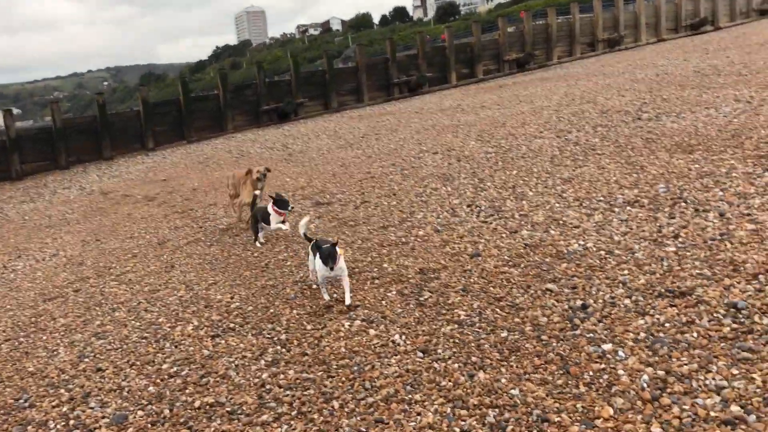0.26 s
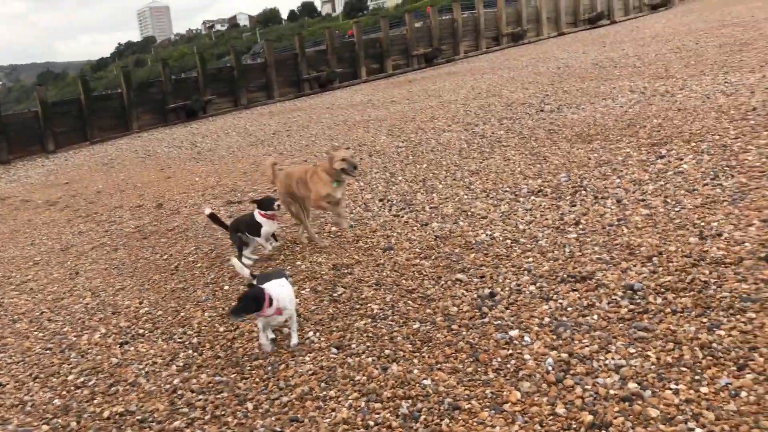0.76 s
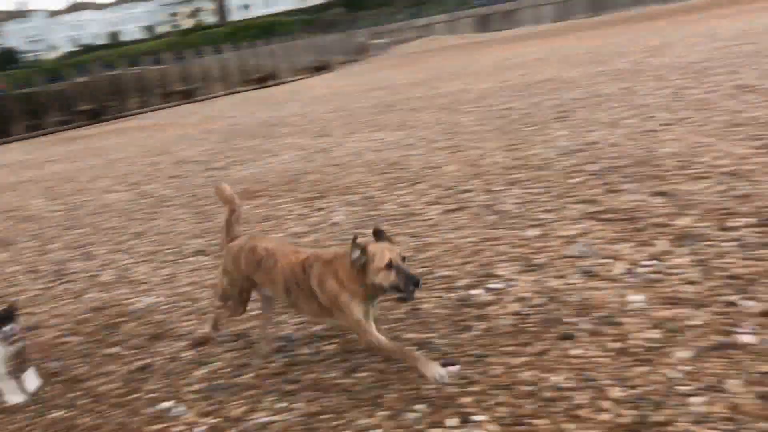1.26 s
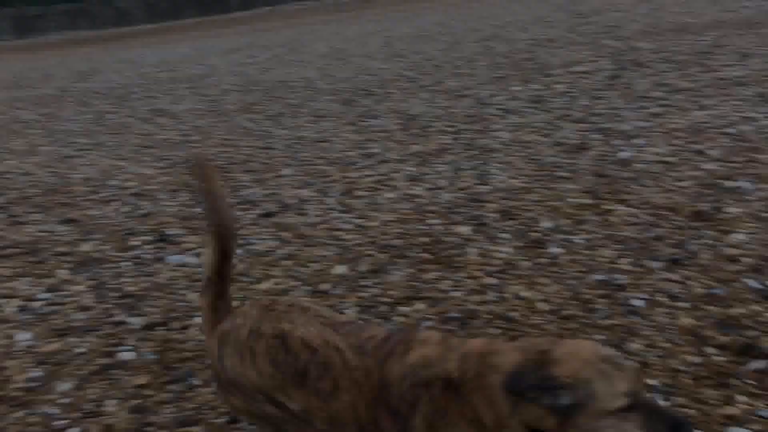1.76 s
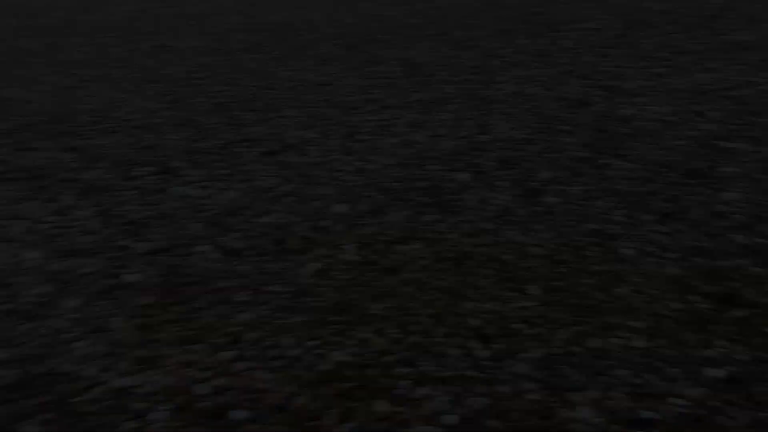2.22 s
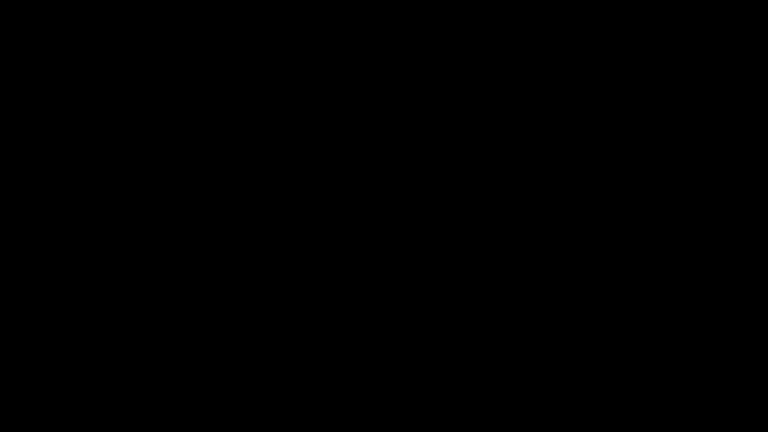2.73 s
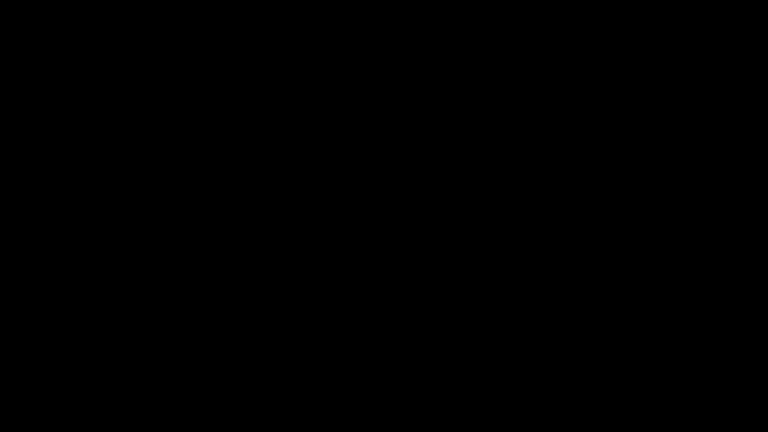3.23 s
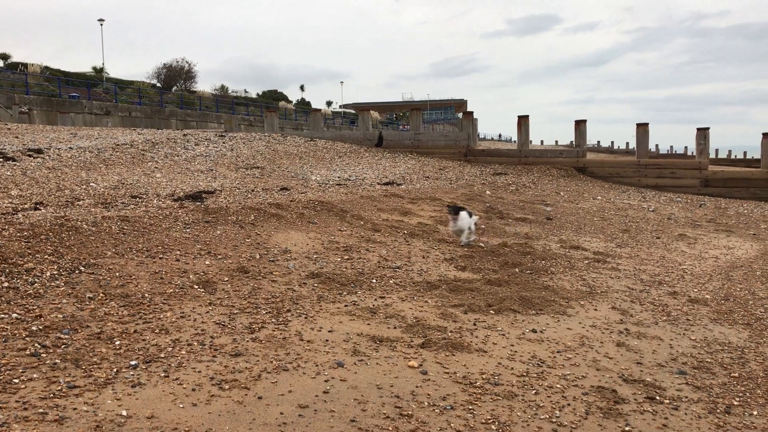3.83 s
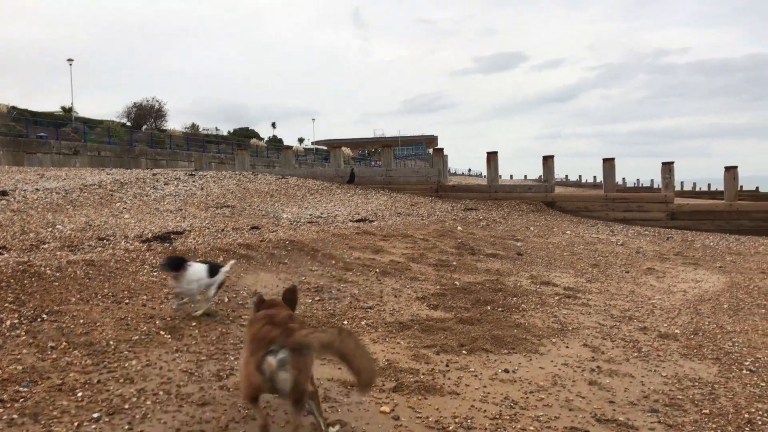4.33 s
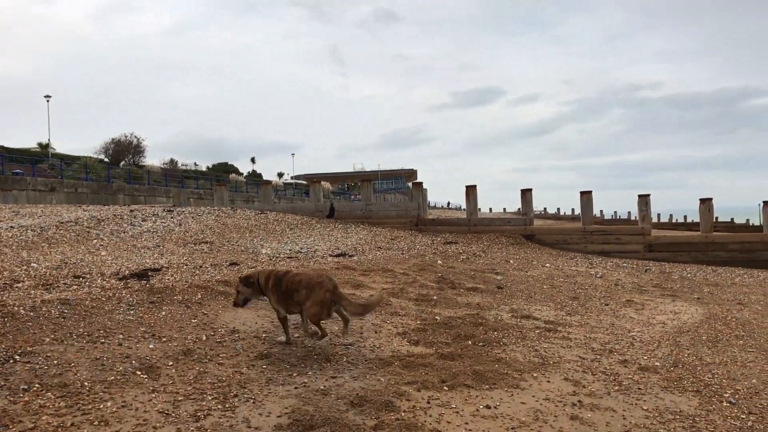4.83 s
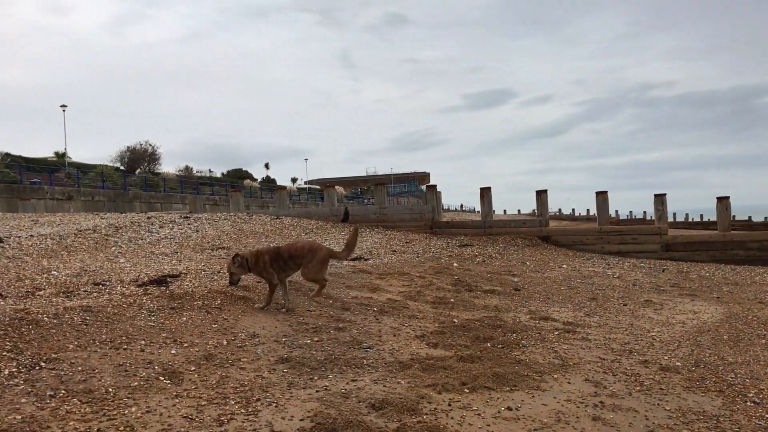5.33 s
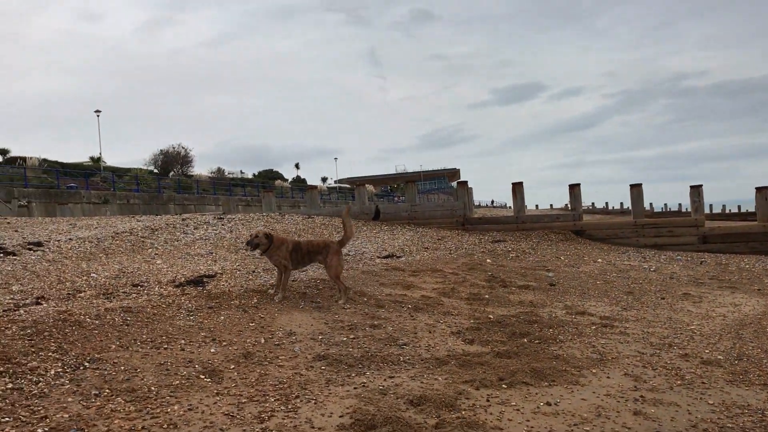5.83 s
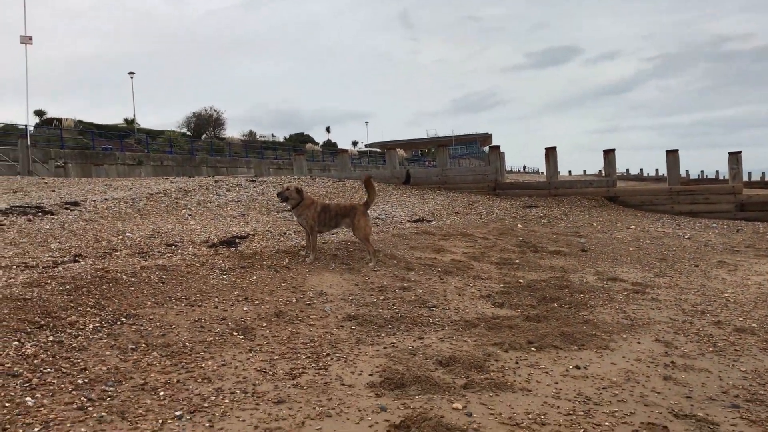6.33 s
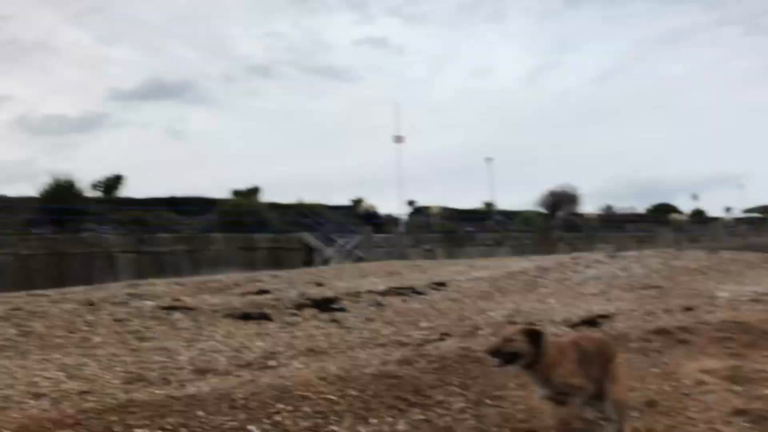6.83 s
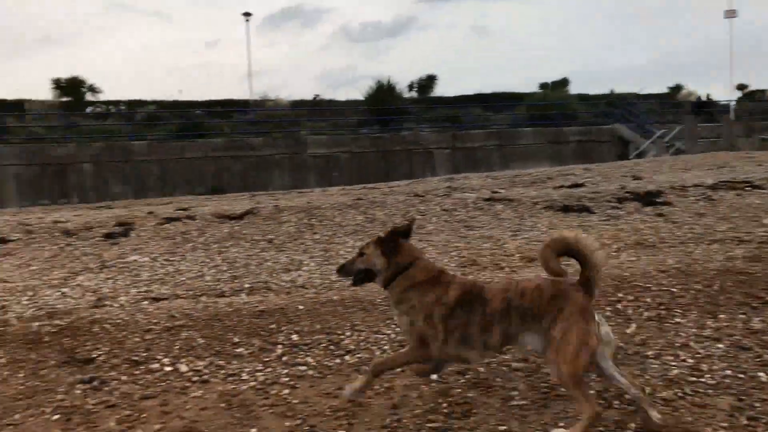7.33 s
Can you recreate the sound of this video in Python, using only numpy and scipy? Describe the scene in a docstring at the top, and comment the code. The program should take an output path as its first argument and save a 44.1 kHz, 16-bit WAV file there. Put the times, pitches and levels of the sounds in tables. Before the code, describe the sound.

Running paws crunch loudly through deep shingle, fade to a brief silence, then lighter pebble steps, stone clacks, tag tinkles and a short dog growl.

```python
"""Shingle crunches under running dogs and a walker: every foot and paw sets off many short pebble knocks.
Single stones clack as sharp ticks with a brief ring; dull low bumps are fading low tones with a soft scuff.
Thin pebbles on damp sand follow the deep shingle, after the sound drops out briefly halfway.
A collar tag tinkles with ringing metal tones; one dog growls in pulses and puffs shaped by its throat.
Filtered noise makes a thin rising scrape, the sand's patter, wind buffeting the one microphone and far-off sea."""
import sys
import numpy as np
from scipy import signal
from scipy.io import wavfile
from scipy.ndimage import map_coordinates

SR = 44100
rng = np.random.default_rng(int(sys.argv[2]) if len(sys.argv) > 2 else 0)


def materialize(psi):
    """Save the field psi as 16-bit PCM at rate SR to the path in sys.argv[1].

    A 1-D psi becomes a single channel; in a 2-D psi each row is a channel.
    """
    bounded = np.clip(np.atleast_2d(psi).T, -1, 1)
    quanta = np.round(bounded * 32767).astype(np.int16)
    wavfile.write(sys.argv[1], SR, quanta)


N = 333560
TIME = np.arange(N) / SR

# Levels in the tables set the balance within a layer; each layer may add its own gain.
# Feet and paws sinking into shingle: peak_s, level_db, fall_s, large_against_small_stones_db
STEPS = [(0.391, -35.5, 0.11, -18), (0.558, -34.0, 0.11, -23), (0.774, -33.0, 0.044, -10),
         (0.882, -31.0, 0.014, -27), (0.943, -31.5, 0.019, -26), (1.006, -29.0, 0.079, -20),
         (1.107, -24.5, 0.034, -17), (1.189, -25.5, 0.071, -11.5), (1.339, -28.5, 0.048, -28),
         (1.444, -16.5, 0.023, -17.5), (1.526, -18.5, 0.024, -11), (1.655, -18.5, 0.036, -22),
         (1.739, -24.0, 0.049, -14), (1.808, -16.5, 0.034, -12.5), (1.882, -14.5, 0.035, -13.5),
         (1.949, -27.5, 0.094, -3.5), (2.021, -22.5, 0.047, -20), (2.128, -20.5, 0.085, -13),
         (2.19, -16.5, 0.04, -12), (2.262, -14.0, 0.066, -17.5), (2.437, -17.5, 0.077, -27),
         (2.62, -29.0, 0.08, -13), (2.795, -26.0, 0.047, -14), (2.826, -26.0, 0.022, -17),
         (3.028, -23.5, 0.041, -14), (3.102, -30.5, 0.015, -12), (3.231, -33.0, 0.052, -16.5),
         (3.769, -43.0, 0.049, -6.5), (3.992, -41.0, 0.088, -5), (4.134, -25.0, 0.012, -6.5),
         (4.18, -32.5, 0.06, -3), (4.313, -30.0, 0.014, -2), (4.357, -34.0, 0.044, -2),
         (4.523, -38.0, 0.054, -0.5), (4.597, -40.5, 0.091, -2), (4.785, -43.0, 0.053, 0.5),
         (4.893, -42.0, 0.13, 0), (4.988, -36.0, 0.052, -2), (5.096, -33.5, 0.021, -10.5),
         (5.153, -41.0, 0.032, -0.5), (5.244, -40.5, 0.083, -3), (5.403, -40.0, 0.064, -1.5),
         (5.508, -43.0, 0.025, -2), (6.976, -44.5, 0.068, -0.5), (7.036, -43.5, 0.05, 3.5),
         (7.145, -43.0, 0.032, -1), (7.244, -37, 0.022, -6.5), (7.335, -30.5, 0.048, -6),
         (7.508, -34, 0.052, -3)]
# Stones shifting under all the other paws as the dogs come near, leave, stand and run again: time_s, level_db
TRAMPLING = [(0, -40), (0.93, -38), (1.53, -26), (1.62, -31.5), (2.05, -26), (2.66, -28.5), (2.78, -40),
             (3.39, -40.5), (3.55, -53.5), (4.1, -51), (4.7, -45), (5.34, -56.5), (5.79, -45), (5.97, -56),
             (6.35, -63), (7.235, -61), (7.255, -39), (7.56, -41)]
# Tone colour of small stones, large stones and stones kicked clear: frequency_hz, relative_level_db (per Hz)
SMALL_STONES = [(150, -43), (700, -31), (2000, -15), (3200, -9.5), (4400, -3.5), (6300, -1.5), (9000, 0.5),
                (12500, 1), (16000, -0.5)]
LARGE_STONES = [(100, -9.5), (300, -4), (520, -2.5), (760, -3), (1050, 1), (2000, -0.5), (3300, 2),
                (4500, 1), (7000, -2), (16000, -45)]
FLUNG_STONES = [(400, -17.5), (1800, -7), (4000, -1), (7000, -0.5), (16000, -12)]
# Tone colour of damp sand under a step: frequency_hz, relative_level_db (per Hz)
SAND = [(70, -34), (150, 4.5), (300, 3), (900, -35.5)]
# Single pebbles struck hard: start_s, level_db, pitch_hz
STONE_CLACKS = [(0.9378, -18, 12800), (1.667, -4.5, 12760), (3.0295, -2, 9700), (3.034, -7, 8300),
                (3.099, -19, 5780), (3.216, -13, 8600), (3.7545, -25.5, 5640), (3.9465, -23.5, 11740),
                (4.131, -11, 12330), (4.2569, -17, 3760), (4.292, -8.5, 2648), (4.313, -7.5, 5920),
                (4.414, -18, 6760), (4.4893, -17.5, 8203), (4.6765, -8, 3520), (5.030, -12, 4335),
                (5.1279, -11, 7133), (5.382, -16, 7150), (6.732, -26.5, 3486), (7.238, -21, 7970),
                (7.333, -15, 6834), (7.419, -15, 4990), (7.498, -17, 3970)]
# Dull low bumps, from paws, jolts of the microphone or wind pops: start_s, level_db, pitch_hz
BUMPS = [(0.403, -19.5, 152.4), (0.428, -21.5, 290), (0.465, -29, 400), (0.78, -29, 285),
         (1.801, -16.5, 279.8), (1.874, -18, 228), (1.890, -17.5, 160), (3.947, -24, 170.4),
         (3.992, -28.5, 216.3), (4.189, -27, 219), (4.311, -19.5, 236), (4.329, -21, 682),
         (4.348, -25, 1091), (4.354, -16.5, 690), (4.357, -19.5, 202), (4.397, -27, 209.4),
         (4.490, -30, 228), (7.042, -26, 109.6), (7.091, -23, 110), (7.100, -25.5, 208)]
# Blows on the collar tag: start_s, level_db, upper_tones_db
TAG_BLOWS = [(2.8804, -24, -11), (3.895, -29.5, 2.5), (4.1057, -36.5, 4.5), (4.4574, -35, 0),
             (5.9366, -41.5, 2.5), (6.066, -40.5, 3), (6.1417, -46, 6), (6.6837, -48, -13),
             (7.2877, -31, 6), (7.4279, -33, 5)]
# Ringing tones of the collar tag: pitch_hz, level_db, time_to_fall_60_db_s
TAG_TONES = [(5723, -12, 0.03), (7221, -3, 0.056), (9670, -6.5, 0.036), (13707, -5, .035)]
# Resonances of the growling dog's throat: pitch_hz, half_width_hz, level_db
THROAT = [(196.6, 54, 5.5), (391.6, 100, -7.5), (1262, 120, -5.5), (2060, 104, -6), (3000, 450, -14)]
# Gusts on the microphone: peak_s, level_db, fall_s
GUSTS = [(0.4, -29, 0.033), (0.44, -31, 0.044), (0.505, -33, 0.018), (0.605, -37, 0.022),
         (0.813, -32.5, 0.021), (0.986, -36.5, 0.031), (1.29, -34, 0.029), (1.525, -41, .022),
         (1.705, -31, 0.027), (1.819, -32, 0.059), (1.891, -32.5, 0.068), (1.987, -30, 0.014),
         (2.216, -46, 0.036), (7.051, -32, 0.019), (7.097, -31.5, 0.029), (7.319, -34.5, 0.027)]
# Strength of the steady breeze: time_s, level_db
BREEZE = [(0.0, -41), (1.1, -42.5), (1.6, -48), (2.2, -46), (3.35, -51.5), (3.8, -44.5), (4.8, -46),
          (6.3, -48.5), (6.9, -44), (7.56, -44.5)]
# Tone colour of breeze, gusts and sea: frequency_hz, relative_level_db (per Hz)
BREEZE_COLOUR = [(20, -20), (35, -9), (52, 12.5), (80, 4.5), (170, 0.5), (300, -15.5), (600, -14),
                 (2000, -42)]
GUST_COLOUR = [(20, -52.5), (40, 10), (60, 6.5), (110, 7.5), (200, -0.5), (320, -16.5), (700, -24.5),
               (2500, -38.5)]
SEA_COLOUR = [(60, -24), (250, 4.5), (440, -3), (700, 3), (1100, 2.5), (1600, 0.5), (2500, -7), (4000, -14),
              (7000, -24), (16000, -19)]
# Dips in treble from the microphone port: centre_hz, width_hz, level_db
PORT_DIPS = [(4900, 110, -4.5), (7640, 340, -2.5), (10480, 490, -4.5)]

GROUND_CHANGE_S = 3.542  # deep shingle gives way to a thin layer of pebbles on damp sand
PRESS_SHARE = 0.44  # a step's build-up time as a share of its fall time
DEEP_COARSE_DB, THIN_COARSE_DB = -10.5, -4.5  # large against small stones in the trampling, on each ground
FLUNG_SHARE, FLUNG_DB = 0.025, -10.5  # a few stones are kicked clear and land with a dry tick
PAD_DB, PAD_FALL_S, PAD_RISE_S = -13, 0.097, 0.033  # the sand's answer, against a step's large stones
SCRAPE_S, SCRAPE_RISE_S, SCRAPE_FALL_S, SCRAPE_DB = 5.39, 0.013, 0.1, -45
SCRAPE_HZ, SCRAPE_HZ_PER_S, SCRAPE_WIDTH_HZ = 2250, 6500, 450
GROWL_S, GROWL_LENGTH_S, GROWL_DB = 4.575, 0.159, -34  # one short growl in the leap
GROWL_ATTACK_S, GROWL_RELEASE_S = 0.017, 0.025
GROWL_HZ, GROWL_SAG_HZ_PER_S = 205.6, 150
GUST_RISE_SHARE = 0.51  # a gust's build-up time as a share of its fall time
SEA_DB = -48.5
FADE_S, QUIET_S = 0.11, 3.5  # a fade ends near this time; almost silent until the ground changes
BLINK_S, BLINK_WIDTH_S, BLINK_DB = 6.941, 0.004, -20  # the level dips briefly
TREBLE_EDGE_HZ = 15850  # the treble is cut around here


def amp(db):
    """Turns decibels into gain."""
    return 10 ** (np.asarray(db) / 20)


def evened(x):
    """Scales a signal to an rms (average strength) of 1."""
    return x / np.sqrt(np.mean(x ** 2) + 1e-20)


def curves(rows, t=TIME):
    """Joins each column of a table by straight lines in time."""
    s, *columns = np.transpose(rows)
    return [np.interp(t, s, c) for c in columns]


def add(mix, s, sound):
    """Mixes a sound in at time s."""
    part = mix[max(round(s * SR), 0):][:len(sound)]
    part += sound[:len(part)]


def filtered(x, db_at, size=8192):
    """Filters with the gain db_at(Hz), never ahead of the sound, so clicks keep their sharp fronts."""
    hz = abs(np.fft.fftfreq(size, 1 / SR))
    log_gain = np.log(amp(np.maximum(db_at(hz), -100)))
    taps = np.fft.ifft(np.exp(np.conj(signal.hilbert(log_gain)))).real
    return signal.oaconvolve(x, taps[:size // 2])[:N]


def coloured(x, spectrum):
    """Gives a white sound a tone colour and keeps its power."""
    f, db = np.transpose(spectrum)

    def colour_db(hz):
        gain = amp(np.interp(np.log(hz + 1), np.log(f), db))
        return 20 * np.log10(evened(gain))

    return filtered(x, colour_db)


def swell(s, rise, fall):
    """Power of one push: it builds up to time s, then dies away."""
    d = TIME - s
    decay = np.where(d < 0, (d / rise) ** 2, d / max(fall, 1e-3))
    return np.exp(-2 * np.minimum(decay, 20))


def flutter(per_s):
    """A random wandering line of rms 1, with per_s corner points a second."""
    knots = rng.standard_normal(4096)
    return evened(np.interp(TIME * per_s, np.arange(len(knots)), knots))


def knocks(per_s, spread_db, ring_s, tick, count=60000, size=128):
    """Pebble contacts of mean power 1: each a tick and a very short ring at the stone's own pitch."""
    gap, pitch, weight, damping, side = rng.random((count, 5)).T
    # random waits between contacts, shorter where per_s is higher
    at = np.searchsorted(np.cumsum(per_s) / SR, np.cumsum(-np.log(1 - gap)))
    at = at[at < N]
    pitch, weight, damping, side = (v[:len(at), None] for v in (pitch, weight, damping, side))
    t = np.arange(size) / SR
    rings = np.sin(np.pi * SR * pitch * t) * np.exp(-t / (ring_s * (0.5 + damping)))
    rings /= np.linalg.norm(rings, axis=1, keepdims=True) + 1e-9
    rings[:, 0] += tick
    # many light knocks and a few heavy ones, pushing either way
    force = evened(amp(spread_db * np.minimum(-np.log(1 - weight), 4.6))) * np.sign(side - 0.5)
    rings *= force * np.sqrt(SR / per_s[at, None] / (1 + tick ** 2))
    places = at[:, None] + np.arange(size)
    return np.bincount(places.ravel(), rings.ravel(), N + size)[:N]


def scatter(x, wet_db, t60):
    """The stony ground gives every contact its own short diffuse tail of noise."""
    keep = np.exp(-2 * np.log(1000) / (t60 * SR))
    tail_level = np.sqrt(signal.lfilter([1 - keep], [1, -keep], x ** 2))
    tail = tail_level * rng.standard_normal(N)
    return (x + amp(wet_db) * tail) / np.sqrt(1 + amp(wet_db) ** 2)


def shingle():
    """The harder the push, the more stones knock; small ones fizz and large ones clatter."""
    small = amp(curves(TRAMPLING)[0]) ** 2
    large = small * amp(np.where(TIME < GROUND_CHANGE_S, DEEP_COARSE_DB, THIN_COARSE_DB)) ** 2
    for s, db, fall, coarse_db in STEPS:
        push = amp(db) ** 2 * swell(s, PRESS_SHARE * fall, fall)
        small = small + push
        large = large + push * amp(coarse_db) ** 2
    per_s = np.clip(2400 * (small / amp(-40) ** 2) ** 0.3, 1500, 12000)  # contacts a second
    slips = amp(0.5 * flutter(per_s=83))  # stones give way in small avalanches

    small_knocks = knocks(per_s, spread_db=3.45, ring_s=0.0004, tick=1.15)
    fizz = scatter(small_knocks, wet_db=-3.5, t60=0.033) * slips * np.sqrt(small)
    large_knocks = knocks(per_s, spread_db=3.0, ring_s=0.0003, tick=1.03)
    clatter = scatter(large_knocks, wet_db=1.5, t60=0.033) * slips * np.sqrt(large)
    flung = knocks(FLUNG_SHARE * per_s, spread_db=3.0, ring_s=0.0006, tick=1.2) * np.sqrt(large)

    fizz = amp(2.0) * coloured(fizz, SMALL_STONES)
    clatter = amp(2.5) * coloured(clatter, LARGE_STONES)
    return fizz + clatter + amp(FLUNG_DB) * coloured(flung, FLUNG_STONES)


def clustered(x, patchy_db, patch_s, patch_hz, size=512):
    """Each cluster of moving stones favours its own pitches for a moment."""
    overlap = 3 * size // 4
    hz, t, z = signal.stft(x, SR, nperseg=size, noverlap=overlap)
    field = rng.standard_normal((size, size))
    grid = np.meshgrid(hz / patch_hz, t / patch_s, indexing="ij")
    patches = evened(map_coordinates(field, grid, order=1, mode="wrap"))
    gain = evened(amp(patchy_db * patches))
    return signal.istft(z * gain, SR, nperseg=size, noverlap=overlap)[1][:N]


def clacks(ring_s=0.00071, ring_db=-14, chatter_s=0.0043, chatter_db=-17, size=1024):
    """One sharp contact between two pebbles, the stone's brief ring, then the chatter of its neighbours."""
    out, t = np.zeros(N), np.arange(size) / SR
    for s, db, hz in STONE_CLACKS:
        knock = amp(chatter_db) * rng.standard_normal(size) * np.exp(-t / chatter_s)
        knock[:2] += [2, -1]
        # bigger stones sound duller
        dulling = signal.butter(1, min(1.3 * hz, 0.45 * SR), fs=SR)
        knock = signal.lfilter(*dulling, knock)
        ring = np.sin(2 * np.pi * hz * t) * np.exp(-t / ring_s)
        add(out, s, amp(db) * (knock + amp(ring_db) * ring))
    return amp(4.5) * coloured(out, [(300, -20.0), (1500, -16), (4000, -7.5), (16000, -1.5)])


def bumps(cycles=0.67, rise_s=0.001, scuff_db=-8, size=3000):
    """Each bump is a fast-fading low tone, with a dull scuff reaching a little higher."""
    out, t = np.zeros(N), np.arange(size) / SR
    for s, db, hz in BUMPS:
        scuff_band = signal.butter(2, [hz / 2, min(1.9 * hz, SR / 4)], "band", fs=SR, output="sos")
        scuff = evened(signal.sosfilt(scuff_band, rng.standard_normal(size)))
        fade = (1 - np.exp(-t / rise_s)) * np.exp(-t / (cycles / hz + 0.0036))
        low_tone = np.sin(2 * np.pi * hz * t)
        add(out, s, amp(db) * fade * (low_tone + amp(scuff_db) * scuff))
    return amp(-0.5) * out


def padding():
    """Damp sand takes each step on the thin layer with a soft, dull, uneven patter."""
    power = np.zeros(N)
    for s, db, _, coarse_db in STEPS:
        if s > GROUND_CHANGE_S:
            power += amp(db + coarse_db + PAD_DB) ** 2 * swell(s, PAD_RISE_S, PAD_FALL_S)
    unevenness = amp(3.1 * flutter(per_s=16))
    return np.sqrt(power) * unevenness * coloured(rng.standard_normal(N), SAND)


def scrape():
    """A thin rising scrape: a narrow band of noise that glides upwards."""
    hz = SCRAPE_HZ + SCRAPE_HZ_PER_S * np.clip(TIME - SCRAPE_S, 0, 2 * SCRAPE_FALL_S)
    low_pass = signal.butter(2, SCRAPE_WIDTH_HZ / 2, fs=SR)
    slow_noise = signal.lfilter(*low_pass, rng.standard_normal((2, N)))
    # a turning carrier lifts the slow noise up to the gliding pitch
    carrier = np.exp(2j * np.pi * np.cumsum(hz) / SR)
    band = evened(((slow_noise[0] + 1j * slow_noise[1]) * carrier).real)
    return amp(SCRAPE_DB) * np.sqrt(swell(SCRAPE_S, SCRAPE_RISE_S, SCRAPE_FALL_S)) * band


def collar_tag(tick_db=-7, tick_s=0.002, size=6000):
    """A small metal disc rings against its buckle; softer blows wake less of its top tone."""
    out, t = np.zeros(N), np.arange(size) / SR
    for s, db, upper_db in TAG_BLOWS:
        sound = amp(tick_db) * rng.standard_normal(size) * np.exp(-t / tick_s)
        for hz, level, t60 in TAG_TONES:
            wake_db = upper_db * (hz > 9000) + min(db + 30, 0) * (hz > 12000)
            tone = np.sin(2 * np.pi * (hz * t + rng.random()))
            sound += amp(level + wake_db - 60 * t / t60) * tone
        add(out, s, amp(db) * sound)
    return amp(3.5) * out


def growl(rough=0.5, jitter=0.05, shake_db=2.9):
    """Uneven pulses and puffs of noise pass the resonances of a nearly closed muzzle; the pitch sags."""
    t = np.clip(TIME - GROWL_S, 0, GROWL_LENGTH_S)
    effort = np.minimum(np.minimum(t / GROWL_ATTACK_S, (GROWL_LENGTH_S - t) / GROWL_RELEASE_S), 1)
    hz = GROWL_HZ - GROWL_SAG_HZ_PER_S * t
    turns = np.cumsum(hz * (1 + jitter * flutter(per_s=130))) / SR
    pulses = np.diff(np.floor(turns), prepend=0) - hz / SR  # one click a turn, with its average removed
    puffs = rng.standard_normal(N) * (0.35 + np.exp(-(turns % 1) / 0.36))
    drive = (1 - rough) * evened(pulses) + rough * evened(puffs)

    def throat_db(f):
        return 20 * np.log10(sum(amp(db) / (1 + ((f - hz) / width) ** 2) for hz, width, db in THROAT))

    voice = evened(filtered(drive, throat_db))
    return effort * amp(GROWL_DB + shake_db * flutter(per_s=70)) * voice


def wind():
    """A low lumpy breeze of filtered noise; gusts add separate bursts with their own tone colour."""
    gust_power = sum(amp(db) ** 2 * swell(s, GUST_RISE_SHARE * fall, fall) for s, db, fall in GUSTS)
    breeze_level = amp(curves(BREEZE)[0] + 1.8 * flutter(per_s=17))
    breeze_noise, gust_noise = rng.standard_normal((2, N))
    breeze = amp(-3.5) * breeze_level * coloured(breeze_noise, BREEZE_COLOUR)
    return breeze + np.sqrt(gust_power) * coloured(gust_noise, GUST_COLOUR)


def sea():
    """Distant surf: a smooth, dull wash of noise with a slight surge."""
    surge_db = 0.7 * flutter(per_s=2.5)
    return amp(SEA_DB + surge_db) * coloured(rng.standard_normal(N), SEA_COLOUR)


def scene():
    """Everything reaches one microphone, alike in both channels."""
    stones = clustered(shingle(), patchy_db=1.3, patch_s=0.05, patch_hz=230)
    near = stones + clacks() + bumps() + padding() + scrape()
    mono = near + collar_tag() + growl() + wind() + sea()
    return np.array([mono, mono])


def record(dry):
    """Applies the port's dips, the fade to near silence, the brief dip in level, then the treble limit."""
    def port_db(f):
        return sum(db * np.exp(-((f - hz) / width) ** 2) for hz, width, db in PORT_DIPS)

    fade_out = np.clip((QUIET_S - TIME) / FADE_S, 0.004, 1) ** 1.7
    fade = np.where(TIME < GROUND_CHANGE_S, fade_out, 1)
    blink = amp(BLINK_DB * np.exp(-((TIME - BLINK_S) / BLINK_WIDTH_S) ** 2))
    heard = np.array([filtered(x, port_db) for x in dry]) * fade * blink
    treble_limit = signal.firwin(511, TREBLE_EDGE_HZ, window=("kaiser", 9), fs=SR)
    return signal.oaconvolve(heard, treble_limit[None], "same")


dry = scene()
out = record(dry)
materialize(out)
```